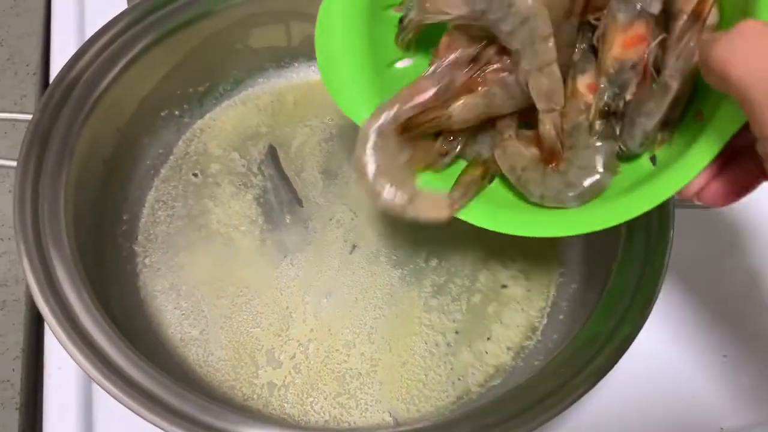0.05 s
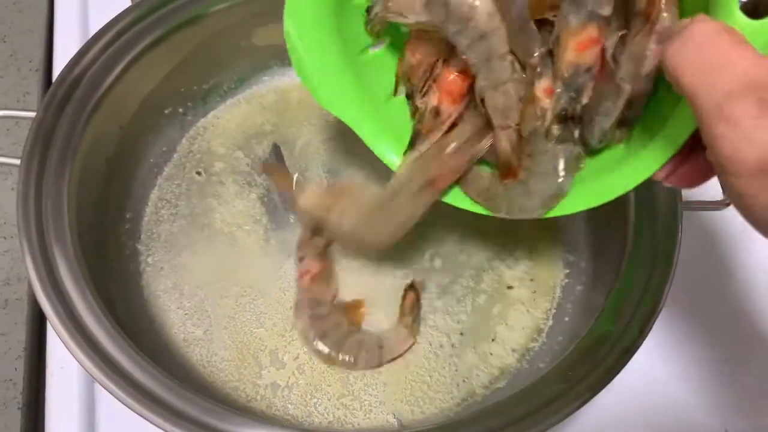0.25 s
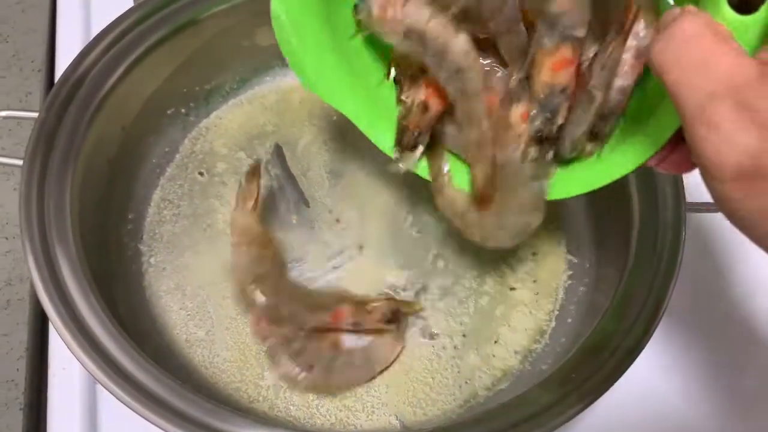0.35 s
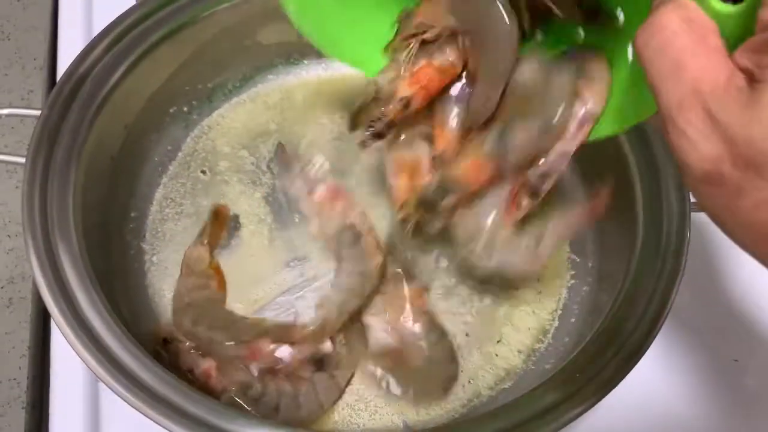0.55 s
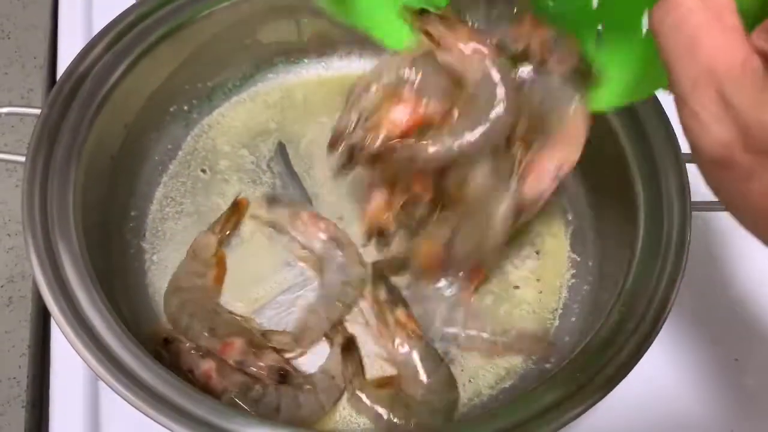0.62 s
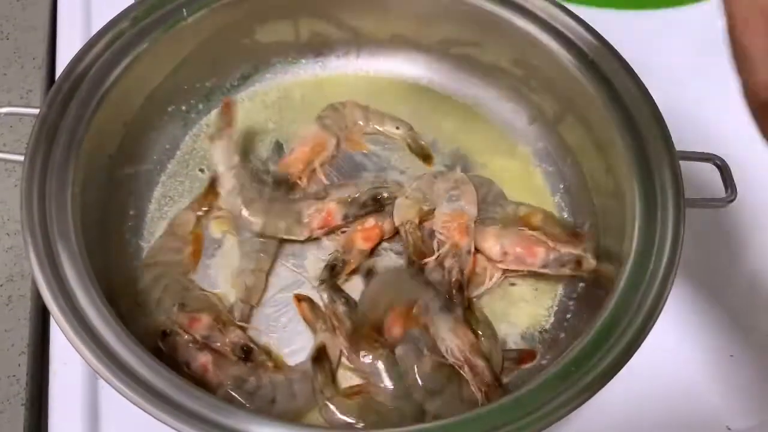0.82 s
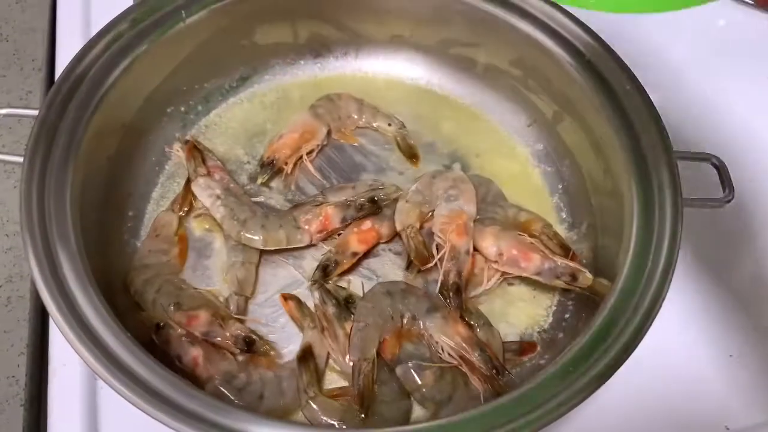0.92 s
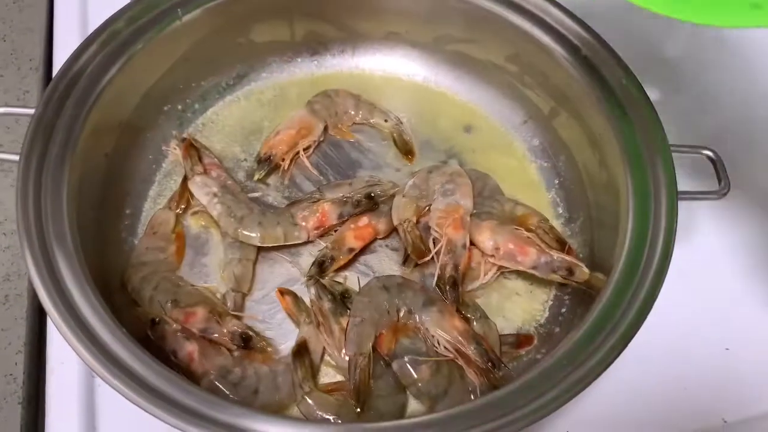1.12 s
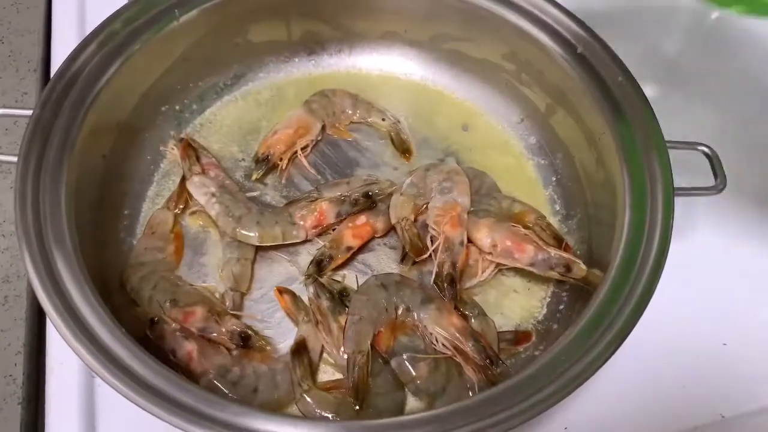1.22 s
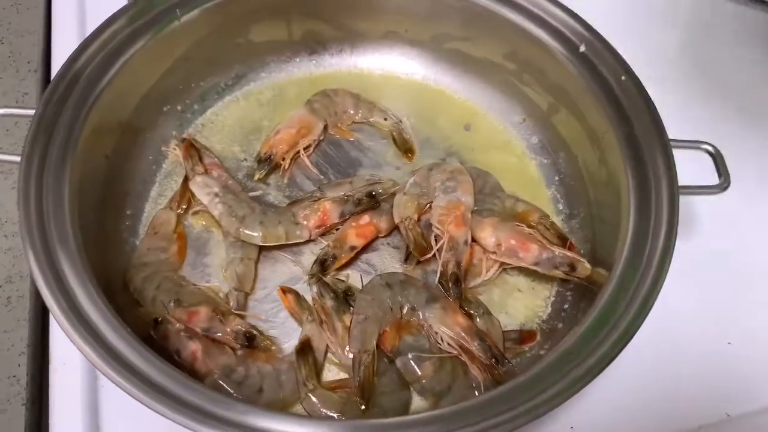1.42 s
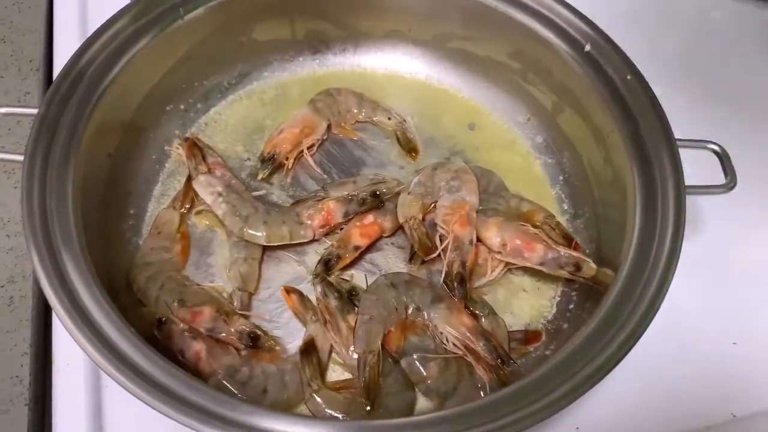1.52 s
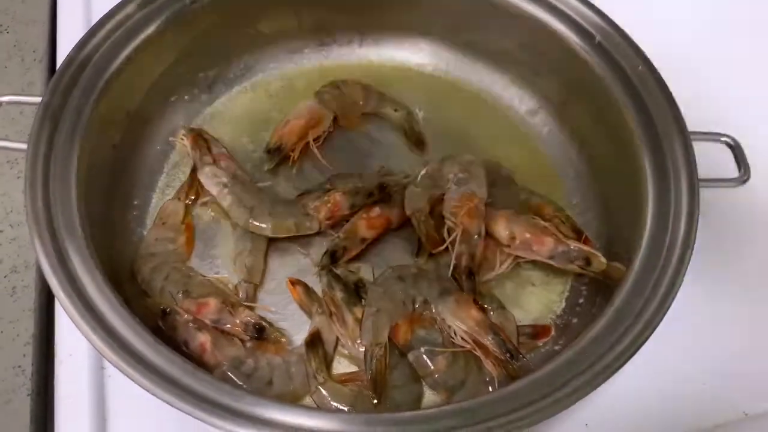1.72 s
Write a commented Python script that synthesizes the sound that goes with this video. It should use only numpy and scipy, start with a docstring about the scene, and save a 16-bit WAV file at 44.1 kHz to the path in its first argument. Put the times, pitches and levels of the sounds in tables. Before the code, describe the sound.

Wet slaps and brief clanks sound up close as raw shrimp tumble out of a rustling colander into a steel pan. The pan thuds softly on the stove, then a few faint butter spits follow over low kitchen hum.

```python
"""Shells rustle on plastic as raw shrimp slide out of a colander, close by, over a small kitchen's hum.
They drop into a steel pan of melted butter: each landing is a wet slap plus a short ring of the base,
which the soft bodies damp. Shells tick on the steel, the heap squelches and trapped air pops.
The pan thuds on the stove and settles, its thin ring lingers, and the hot butter gives a few spits."""
import sys
import numpy as np
from scipy import signal
from scipy.fft import rfft, irfft
from scipy.io import wavfile

SR = 44100
rng = np.random.default_rng(int(sys.argv[2]) if len(sys.argv) > 2 else 0)


def master_out(mix):
    """Clip the mix to full scale and print it as 16-bit PCM to the path in sys.argv[1]."""
    frames = np.transpose(np.atleast_2d(mix))
    ceiling = np.clip(frames, -1, 1)
    pcm = np.round(ceiling * 32767).astype(np.int16)
    wavfile.write(sys.argv[1], SR, pcm)


N = 77175
SLAP_RISE_S, ROOM_T60_S = 0.00075, 0.39


def undb(db):
    return 10 ** (np.asarray(db) / 20)


def unit(x):
    return x / np.sqrt(np.mean(x ** 2))


def since(start):
    """Seconds since a moment, zero before it."""
    return np.maximum(np.arange(N) / SR - start, 0)


def curve(points):
    """Gain envelope through (time_s, level_db) points."""
    return undb(np.interp(since(0), *np.array(points).T))


def fading(points, release_s=0.05):
    """A gain envelope that dies away after its last point."""
    return curve(points) * np.exp(-since(points[-1][0]) / release_s)


def burst(start, rise_s, decay_s):
    """Envelope with a quick attack and an exponential fall, peak 1."""
    t = since(start)
    shape = (1 - np.exp(-t / rise_s)) * np.exp(-t / decay_s)
    return shape / shape.max()


def tone(t, hz, phase=0):
    """A sine of unit power."""
    return np.sqrt(2) * np.sin(2 * np.pi * hz * t + phase)


def ring(t, hz, t60, phase, rise_s):
    """One damped mode, pushed by a soft body."""
    return (1 - np.exp(-t / rise_s)) * np.exp(-np.log(1000) * t / t60) * tone(t, hz, phase)


def snap(start, hiss):
    """A sharp impulse with a tiny tail of hiss."""
    click = undb(14) * signal.unit_impulse(N, int(start * SR))
    return click + hiss * burst(start, rise_s=0.0009, decay_s=0.0018)


def colour(x, points):
    """Causal EQ shaped by (freq_hz, gain_db) points, scaled to keep the power of white noise."""
    size = 2 * N
    hz, db = np.array(points).T
    log_freq = np.log(np.fft.rfftfreq(size, 1 / SR) + 1)
    gain = unit(undb(np.interp(log_freq, np.log(hz), db)))
    cepstrum = irfft(np.log(gain))
    cepstrum[1:N] *= 2  # fold to minimum phase
    cepstrum[N + 1:] = 0
    return irfft(rfft(x, size) * np.exp(rfft(cepstrum)))[..., :N]


def sides(db):
    """Stereo gains with the left louder by db."""
    return undb(np.array([[db], [-db]]) / 2)


def grains(per_s, spread_db):
    """Dense tiny clicks of uneven size."""
    size = undb(spread_db * np.minimum(rng.exponential(size=N), 2 * np.e))
    return unit((rng.random(N) < per_s / SR) * size * rng.choice([-1, 1], N))


def stereo_noise(side):
    """Centred noise, widened by separate noise in each channel."""
    return unit(rng.standard_normal(N) + side * rng.standard_normal((2, N)))


def narrow_noise(hz, width_hz):
    """A wavering tone: noise in a very narrow band."""
    band = np.exp(-((np.fft.rfftfreq(N, 1 / SR) - hz) / width_hz) ** 2)
    return unit(irfft(rfft(stereo_noise(side=0.9)) * band, N))


def echoes(x, t60, onset_s):
    """Diffuse reflections, unrelated left and right."""
    t = since(onset_s)
    tail = rng.standard_normal((2, N)) * (t > 0) * np.exp(-np.log(1000) * t / t60)
    return signal.fftconvolve(np.atleast_2d(x), unit(tail) / np.sqrt(N), axes=1)[:, :N]


# Envelope of the slide: time_s, level_db (table levels are relative, ahead of EQ and mix gains)
SLIDE_ENVELOPE = [(0, -56), (.035, -54.5), (.08, -65), (.12, -59), (.2, -55.5), (.44, -57.5), (.7, -48.5),
                  (.86, -75), (1.02, -80)]
# Tone of the plastic colander: freq_hz, gain_db
PLASTIC_EQ = [(300, -32), (1200, -2), (2200, -2.5), (2950, 3), (3800, -2), (5000, -7.5), (6600, -2.5),
              (8300, -13), (11000, -11.5), (16000, -16)]
def colander_slide():
    """Shells sliding on plastic make a grainy rustle."""
    return colour(fading(SLIDE_ENVELOPE) * grains(per_s=6500, spread_db=5.5), PLASTIC_EQ)


# Low rush of the room: freq_hz, gain_db
ROOM_TONE_EQ = [(15, -42), (25, -23), (55, -1), (105, -1), (170, -7), (260, -7), (400, -12), (700, -21.5),
                (1000, -26.5), (1500, -30.5), (2000, -42), (4000, -48), (10000, -46), (16000, -48)]
# Steady hum lines: pitch_hz, level_db
HUM_LINES = [(208, -73.5), (258, -67), (1484, -84)]
def kitchen():
    """A low room rush and a faint hum."""
    rush = undb(-54.5) * colour(stereo_noise(side=1.0), ROOM_TONE_EQ)
    return rush + sum(undb(db) * narrow_noise(hz, width_hz=3.8) for hz, db in HUM_LINES)


# Envelope of the pan's thudding: time_s, level_db
THUD_ENVELOPE = [(0, -63), (.19, -60), (.23, -47.5), (.47, -50.5), (.56, -46.5), (.79, -42), (.85, -50),
                 (1.0, -70), (1.75, -67.5)]
# Bass weight of the thudding: freq_hz, gain_db
THUD_EQ = [(15, -55.5), (30, -12), (50, -3), (100, -3), (160, -7.5), (220, -22), (400, -13.5),
           (1500, -48.5), (16000, -87.5)]
# Dull bumps of the pan settling: start_s, level_db
SETTLING_BUMPS = [(0.306, -43), (0.543, -42), (0.763, -55), (0.893, -46), (1.077, -68), (1.262, -48.5)]
def stove_thuds(bump_hz=70.3):
    """The pan thuds on the stove as the shrimp tumble in, and settles with a few bumps."""
    thudding = curve(THUD_ENVELOPE) * colour(stereo_noise(side=0.16), THUD_EQ)
    bumps = sum(undb(db) * burst(start, rise_s=0.0015, decay_s=0.003) * tone(since(start), bump_hz)
                for start, db in SETTLING_BUMPS)
    return undb(-1.5) * thudding + bumps


# Shells striking steel: start_s, level_db
SHELL_HITS = [(0.03, -59), (0.042, -64), (0.1186, -49), (0.1533, -42), (0.176, -62), (0.1953, -41.5),
              (0.217, -38), (0.2373, -29), (0.239, -24.5), (0.283, -37.5), (0.3412, -28.5), (0.4069, -35),
              (0.479, -29), (0.4835, -25), (0.535, -37), (0.564, -27.5), (0.639, -43.5), (0.705, -17.5),
              (0.719, -30.5), (0.754, -45), (0.766, -16), (0.802, -26)]
def shell_ticks(hiss):
    """Hard shells tick against the pan."""
    return sum(undb(db) * snap(start, hiss) for start, db in SHELL_HITS)


# Bright modes of the steel: pitch_hz, level_db, t60_s
STEEL_MODES = [(2086, -5, 0.13), (2540, -10, .13), (3023, -0.5, 0.11), (3525, -10.5, .1),
               (4284, -8.5, 0.14), (5123, -6, .1), (5450, -10, .1), (5900, -10, .07), (6865, 2, 0.091),
               (7265, 0, .07), (7615, -4.5, .07)]
def steel_overtones(contact, spread_rad=0.4):
    """Each contact sets off a short shimmer, a little out of phase between left and right."""
    modes = sum(undb(db) * ring(since(0), hz, t60, spread_rad * rng.uniform(-1, 1, (2, 1)), SLAP_RISE_S)
                for hz, db, t60 in STEEL_MODES)
    return undb(-16) * signal.fftconvolve(contact[None], unit(modes) / np.sqrt(N), axes=1)[:, :N]


def droplets(per_s=2600, low_hz=2027, high_hz=15975, spread_db=2.4, decay_cycles=16):
    """Tiny films and bubbles burst in a swarm of pings, each with its own pitch and size."""
    t = np.arange(SR // 100) / SR
    out = np.zeros(N + len(t))
    for when, pitch, chance in rng.random((int(per_s * N / SR), 3)):
        hz = low_hz + pitch * (high_hz - low_hz)
        size = undb(-spread_db * np.log(1 - chance)) * np.sqrt(hz)
        at = int(when * N)
        out[at:at + len(t)] += size * np.exp(-t * hz / decay_cycles) * np.sin(2 * np.pi * hz * t)
    return unit(out[:N])


def wet_crackle(clicks_per_s, spread_db):
    """Wet texture: droplets and plain clicks at equal power."""
    return np.sqrt(0.5) * (droplets() + grains(clicks_per_s, spread_db))


# Envelope of the squelch: time_s, level_db
SQUELCH_ENVELOPE = [(0.1, -100), (.2, -63), (.27, -47.5), (.38, -52), (.44, -48), (.55, -48.5), (.63, -41),
                    (.655, -45.5), (.70, -36.5), (.76, -40.5), (.795, -45.5), (.83, -45.5), (.88, -61.5),
                    (.93, -87)]
def squelch():
    """The wet heap crackles as it slides."""
    return fading(SQUELCH_ENVELOPE) * wet_crackle(clicks_per_s=5500, spread_db=1.5)


# Shrimp landing; each cue drives the slap, the ring and the knock:
# start_s, low_ring_db, middle_ring_db, high_ring_db, knock_db, slap_db, slap_decay_s, ring_pitch_ratio
LANDING_CUES = [ (0.194, -34.5, -36, -33, -47, -55, 0.0021, 0.98),
                (0.238, -25.5, -40, -42.5, -40, -27, 0.0092, 1.0),
                (0.283, -33, -33, -51.5, -47, -36.5, 0.0074, 0.99),
                (0.343, -33, -30.5, -39, -44.5, -34.5, 0.0028, 1.0),
                (0.406, -67, -44, -44, -62, -40, 0.0055, 0.98),
                (0.4819, -19.5, -14, -23.5, -33, -26, 0.0094, 1.0),
                (0.5639, -29.5, -26, -31.5, -43, -31, 0.0046, 0.99),
                (0.593, -28.5, -50.5, -59, -48.5, -47, 0.0044, 1.0),
                (0.606, -26, -34, -29, -43.5, -23, 0.0048, 1),
                (0.615, -24, -26.5, -43, -47.5, -33.5, 0.0025, 1.0),
                (0.6609, -23, -36.5, -33.5, -42, -36, 0.0041, 0.99),
                (0.673, -49, -43, -40.5, -48.5, -23.5, 0.006, 0.85),
                (0.682, -43.5, -50, -32, -49.5, -23, 0.013, 1),
                (0.704, -48.5, -28, -40.5, -45.5, -36.5, 0.0038, 1),
                (0.73, -30.5, -51, -43.5, -54.5, -39.5, 0.009, 0.98),
                (0.766, -42, -30, -49, -55.5, -27.5, 0.0048, 0.98),
                (0.803, -48.5, -48, -55, -55.5, -31, 0.0092, 0.94)]
def wet_slaps():
    """Each wet body lands with a short burst of crackle."""
    envelope = sum(undb(db) * burst(start - SLAP_RISE_S, SLAP_RISE_S, decay)
                   for start, *_, db, decay, _ in LANDING_CUES)
    return envelope * wet_crackle(clicks_per_s=9000, spread_db=1.8)


# Low, middle and high mode pairs of the pan's base:
# pitch_hz, rise_s, t60_s, partner_hz, partner_db, left_over_right_db, left_lead_rad
BASE_PAIRS = [(579.7, .0028, 0.17, 566, -17.5, 4.5, .7), (1103.6, 0.005, 0.11, 1000, -14, 3, 0.4),
              (1739, 0.0031, 0.12, 1400, -21, 1.5, 1.0)]
def base_ring():
    """Every landing rings three pairs of modes, kept short by the soft bodies."""
    out = np.zeros((2, N))
    for start, low, middle, high, *_, pitch in LANDING_CUES:
        t = since(start)
        for db, pair in zip((low, middle, high), BASE_PAIRS):
            hz, rise, t60, partner_hz, partner_db, balance_db, lead = pair
            phase = np.array([[lead], [0]])
            main = ring(t, hz * pitch, t60, phase, rise)
            partner = undb(partner_db) * ring(t, partner_hz * pitch, t60, phase, rise)
            out += undb(db) * sides(balance_db) * (main - partner)
    return undb(-3) * out


# Weaker modes of the wall and rim: pitch_hz, level_db, t60_s
RIM_MODES = [(260.4, -30.5, .25), (646.5, -11.5, 0.1), (720, -14, 0.033), (1197, -20, 0.12)]
def wall_ring(detune=0.0016):
    """Wall and rim ring along, following the level of the base's middle ring."""
    out = np.zeros((2, N))
    for start, _, middle_db, *_ in LANDING_CUES:
        for hz, db, t60 in RIM_MODES:
            detuned_hz = hz * (1 + detune * rng.standard_normal())
            phase = 2 * np.pi * rng.random((2, 1))
            out += undb(middle_db + db) * ring(since(start), detuned_hz, t60, phase, rise_s=0.0037)
    return out


# Dull body of the knock: freq_hz, gain_db
KNOCK_EQ = [(100, -5), (300, -17), (700, 1), (1200, 1), (2500, -7), (6000, -27), (16000, -66.5)]
def knocks():
    """Each soft body hits the base with a dull puff of noise."""
    envelope = sum(undb(db) * burst(start, rise_s=0.0016, decay_s=0.0034)
                   for start, _, _, _, db, *_ in LANDING_CUES)
    return envelope * colour(stereo_noise(side=1.0), KNOCK_EQ)


# Air pockets popping: start_s, pitch_hz, level_db, decay_s
AIR_POCKETS = [(0.684, 1663, -31.5, .003), (0.7656, 6300, -30.5, 0.001)]
def air_pops():
    """Air trapped under the heap escapes in short hollow notes."""
    return sum(undb(db) * burst(start, decay, decay) * tone(since(start), hz)
               for start, hz, db, decay in AIR_POCKETS)


# Faint tones of the pan's long ring: pitch_hz, width_hz, peak_s, half_length_s, level_db
RING_SWELLS = [(1113, 5, 1.2, 0.26, -70.5), (1070, 36, 1.42, 0.055, -67.5), (1104, 32, 1.58, 0.07, -69),
               (898, 3.1, 1.45, 0.47, -76)]
def lingering_ring():
    """The pan's thin, lingering ring swells and fades."""
    return sum(undb(db) * np.exp(-((since(0) - peak) / half) ** 2) * narrow_noise(hz, width)
               for hz, width, peak, half, db in RING_SWELLS)


# Spits of the butter: start_s, level_db
BUTTER_SPITS = [(1.0864, -60), (1.326, -64), (1.465, -70)]
def butter_spits(hiss):
    """Hot butter spits faintly once the shrimp are in."""
    return sum(undb(db) * snap(start, hiss) for start, db in BUTTER_SPITS)


# Tone of the reflections: freq_hz, gain_db
SCATTER_EQ = [(200, 7), (2000, 7.5), (5000, 7.5), (7000, -2.5), (10000, -16), (16000, 1.5)]
def in_pan(x, left_lag_s=0.0001761):
    """Places a sound just right of centre, scattered by the pan's wall and the room."""
    delay = np.exp(-2j * np.pi * np.fft.rfftfreq(2 * N, 1 / SR) * left_lag_s)
    left = irfft(rfft(x, 2 * N) * delay)[:N]
    send = colour(x, SCATTER_EQ)
    wall = undb(-3) * echoes(send, t60=0.056, onset_s=0.00059)
    room = undb(-15) * echoes(send, ROOM_T60_S, onset_s=0.0032)
    return sides(-0.5) * (np.array([left, x]) + wall + room)


# Sheen of the slaps and squelch: freq_hz, gain_db
WET_EQ = [(200, -23.5), (700, -5.5), (1500, -0.5), (2300, 0.5), (3000, 2.5), (5000, -2), (7000, 3),
          (9800, 7.5), (11000, 3.5), (13000, 0.5), (16000, 3)]
# Crisp edge of the ticks and spits: freq_hz, gain_db
TICK_EQ = [(300, -13), (1500, -6.5), (4500, -8.5), (6300, -20), (8000, -7.5), (10500, 4), (13000, -9),
           (16000, 3)]
def scene():
    """The ringing pan and close shrimp textures, over stove thuds and room tone."""
    pan = base_ring() + wall_ring() + knocks()
    pan += undb(-11.5) * echoes(pan.mean(0), ROOM_T60_S, onset_s=0.0024)
    hiss = undb(-6) * rng.standard_normal(N)
    ticks = shell_ticks(hiss) + butter_spits(hiss)
    wet = wet_slaps() + squelch()
    textures = undb(-2.5) * in_pan(colander_slide() + colour(ticks, TICK_EQ) + colour(wet, WET_EQ))
    shimmer = steel_overtones(wet + ticks)
    return pan + textures + shimmer + air_pops() + stove_thuds() + kitchen() + lingering_ring()


def record(dry):
    """A steep low-pass at 15750 Hz trims the very top."""
    return signal.sosfilt(signal.ellip(8, .2, 70, 15750, fs=SR, output="sos"), dry)


dry = scene()
out = record(dry)
master_out(out)
```